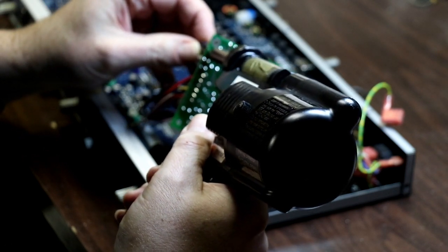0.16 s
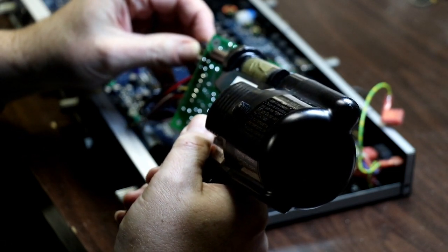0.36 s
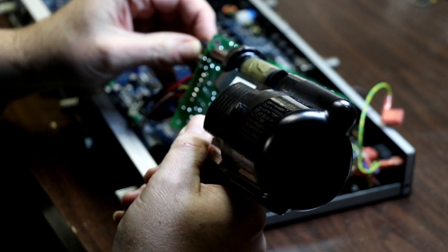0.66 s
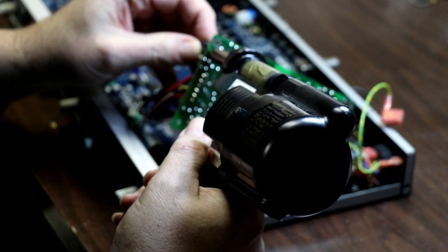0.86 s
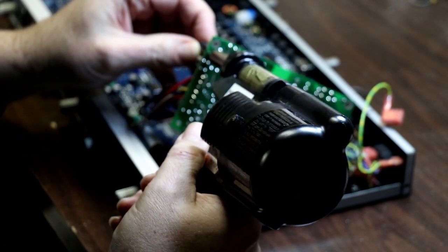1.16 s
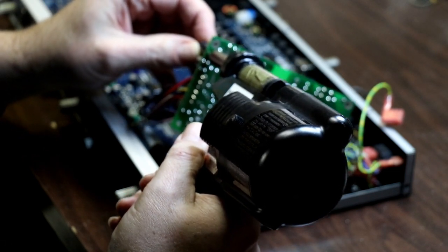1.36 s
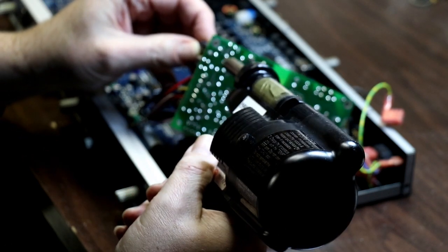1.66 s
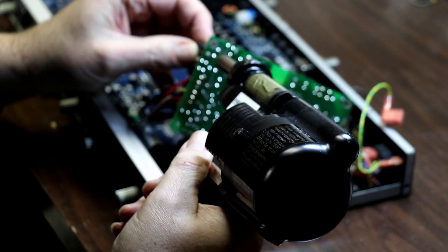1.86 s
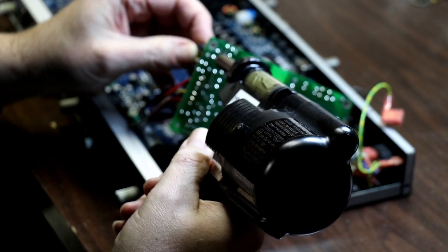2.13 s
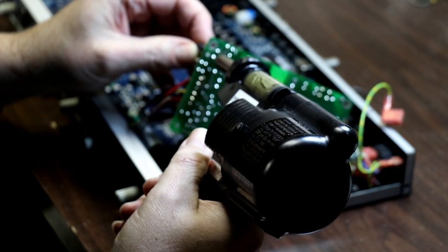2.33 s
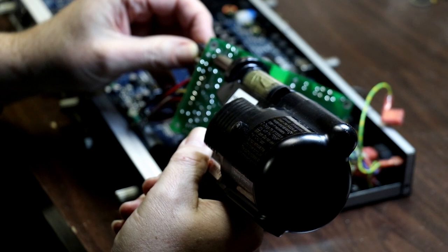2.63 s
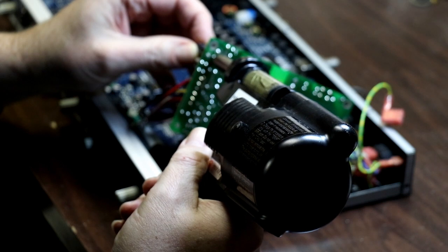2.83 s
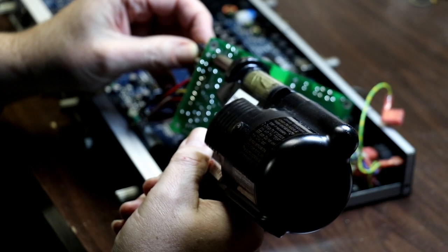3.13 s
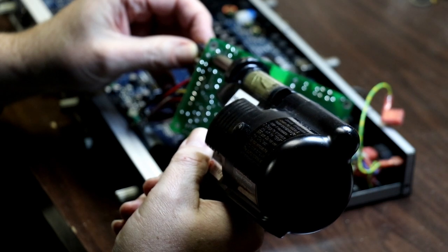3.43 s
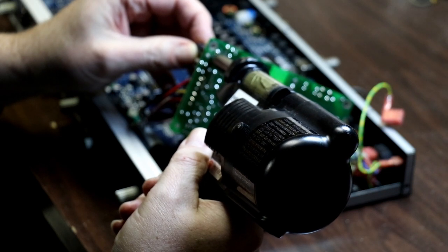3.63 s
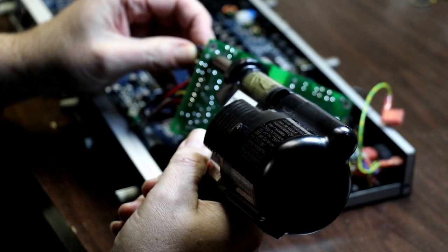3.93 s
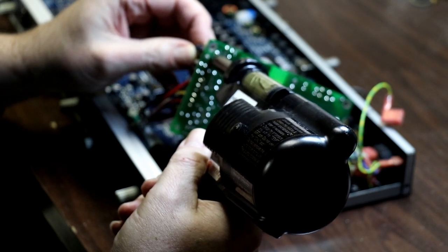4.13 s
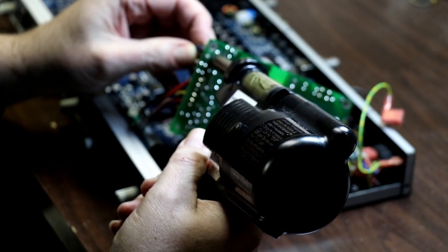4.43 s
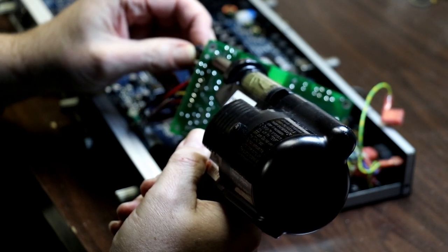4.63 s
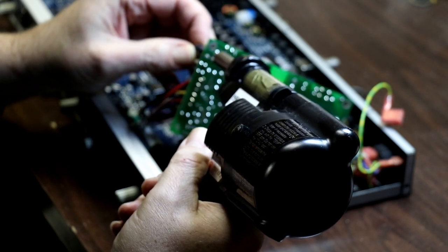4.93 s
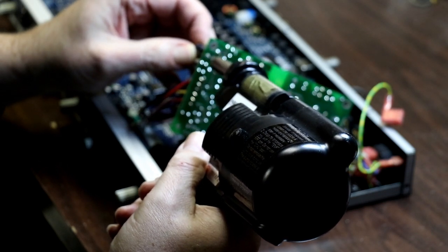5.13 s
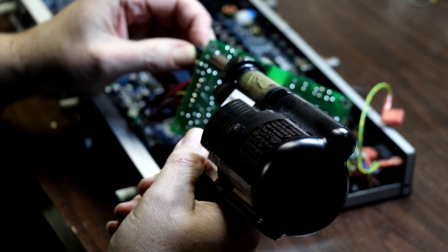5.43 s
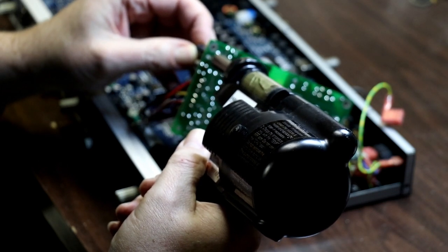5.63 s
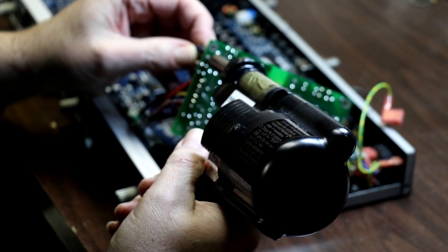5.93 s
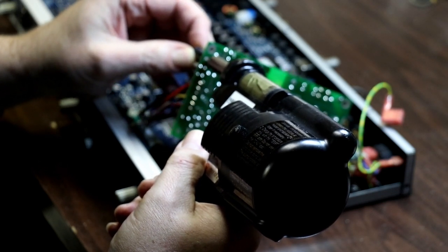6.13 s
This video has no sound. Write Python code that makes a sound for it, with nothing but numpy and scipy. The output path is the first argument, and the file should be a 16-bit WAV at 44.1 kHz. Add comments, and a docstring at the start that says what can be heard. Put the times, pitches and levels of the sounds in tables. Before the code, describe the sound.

Close vacuum-pump buzz and hissing air start and stop twice with sharp switch clicks, small taps in between, a fan humming steadily behind.

```python
"""In a small workshop a fan hums and whooshes throughout, further off than the gun at the stereo microphone.
A hand-held desoldering gun is triggered twice, close by over a workbench and a little to the right: the switch
snaps, a motor spins up a diaphragm pump, the first stroke knocks, the plastic body buzzes as a comb of stroke
multiples and rattles by its resonances, and noise hisses through the nozzle. At each release the switch snaps
again and the motor coasts down. Between the bursts and at the second press, short noise bursts tap."""
import sys
import numpy as np
from scipy import signal
from scipy.fft import rfft, irfft
from scipy.io import wavfile

SR = 44100
rng = np.random.default_rng(int(sys.argv[2]) if len(sys.argv) > 2 else 0)


def persist_wave(psi):
    """Save psi, clipped to +-1, as 16-bit WAV."""
    counts = np.round(np.clip(psi, -1, 1) * 32767).astype(np.int16)
    wavfile.write(sys.argv[1], SR, np.atleast_2d(counts).T)


N = 277080
TIME = np.arange(N) / SR


def from_db(db):
    """Decibels to gain."""
    return 10 ** (np.asarray(db) / 20)


def rms_one(x):
    """Scale to unit rms."""
    return x / np.sqrt(np.mean(x ** 2) + 1e-20)


def in_time(rows):
    """Columns of a curve table whose first column is seconds, one value per sample."""
    seconds, *columns = np.transpose(rows)
    return [np.interp(TIME, seconds, column) for column in columns]


def drift(rate_hz):
    """Slow random wander with spread 1: low-passed noise made at every 40th sample."""
    pole = np.exp(-80 * np.pi * rate_hz / SR)
    noise = rng.standard_normal(N // 40 + 2002)
    slow = signal.lfilter([1], [1, -2 * pole, pole * pole], noise)[2000:]   # drop the filter's start
    return np.interp(np.arange(N) / 40, np.arange(len(slow)), rms_one(slow))


def sides(pan_db):
    """Left and right gains of a left-minus-right level difference."""
    return from_db(np.array([[.5], [-.5]]) * pan_db)


def resonate(x, hz, width_hz):
    """Two-pole resonance; a unit click rings with a height of about 1."""
    radius, angle = np.exp(-np.pi * width_hz / SR), 2 * np.pi * hz / SR
    poles = [1, -2 * radius * np.cos(angle), radius * radius]
    return signal.lfilter([0, np.sin(angle)], poles, x + 1e-18)


def stereo_noise(spectrum, alike):
    """Coloured noise whose two sides agree as the likeness table says; rms 1."""
    log_hz = np.log(np.arange(1, N // 2 + 2) * SR / N)
    level_db, like = (np.interp(log_hz, np.log(np.array(p)[:, 0]), np.array(p)[:, 1])
                      for p in (spectrum, alike))
    like = np.clip(like, 0, 1)
    mid, side = rfft(rng.standard_normal((2, N)))
    both = np.sqrt(1 + like) * mid + np.sqrt(1 - like) * side * [[1], [-1]]
    return rms_one(irfft(from_db(level_db) * both, N))


ROOM_T60_S, ROOM_DB = 0.28, -4.5


def room(x):
    """Diffuse tail of the small workshop: decaying noise from 4 ms on, another one for each side."""
    t = np.arange(SR // 2) / SR
    tail = rng.standard_normal((2, len(t))) * from_db(-60 * t / ROOM_T60_S) * (t > .004)
    tail = tail / np.sqrt(np.sum(tail ** 2, axis=1, keepdims=True))
    return signal.fftconvolve(x, tail, axes=1)[:, :N]


# Fan air and room hiss. Each row: frequency in Hz, relative level in dB per Hz.
WHOOSH_SPECTRUM = [(20, -32), (50, -23), (90, -29), (107, -26), (118, -15.5), (185, -12), (215, -21.5),
                   (265, -21.5), (320, -23.5), (370, -18.5), (450, -25.5), (900, -31.5), (1280, -30),
                   (2000, -38), (4800, -48.5), (7200, -44), (11000, -47), (15800, -55)]
# How alike the whoosh is at the two capsules. Each row: frequency in Hz, left-right likeness (1 = same).
WHOOSH_LIKENESS = [(25, 0.75), (60, 0.82), (150, 1), (380, 0.84), (950, 0.41), (2400, 0.071), (6000, 0)]
# Weaker fan tones. Each row: frequency in Hz, mean rms level in dB.
FAN_TONES = [(48.4, -63), (72, -73), (96.5, -73), (121, -56.5), (145, -58.5), (242, -64.5), (264, -58.5),
             (355, -60.5), (385, -63), (625, -66.5), (700, -71)]
# Wavering blade hum. Each row: time in seconds, mean rms level in dB.
BLADE_LEVEL = [(0, -45), (.15, -42.5), (1.56, -46), (2.24, -42), (2.3, -59), (2.38, -43), (2.92, -46),
               (3.02, -53.5), (3.3, -47), (3.66, -40.5), (5.04, -52), (5.2, -39), (5.55, -45), (5.86, -42),
               (5.93, -57), (6.04, -45.5), (6.11, -55), (6.2, -38), (6.28, -45)]
BLADE_HZ, WHOOSH_DB = 192.8, -46.5


def fan():
    """Further off: air turbulence as noise, a wavering blade hum and weaker tones as drifting sines."""
    whoosh = from_db(WHOOSH_DB + 1.0 * drift(6.2)) * stereo_noise(WHOOSH_SPECTRUM, WHOOSH_LIKENESS)
    hum_gain = from_db(in_time(BLADE_LEVEL)[0] + 1.9 * drift(7))
    hum = hum_gain * np.sin(2 * np.pi * BLADE_HZ * TIME + 0.67 * drift(2.8))
    for hz, db in FAN_TONES:
        tone = np.sin(2 * np.pi * hz * TIME + 0.89 * drift(1.94))
        hum = hum + from_db(db + 2.0 * drift(3.9)) * tone
    return whoosh + np.sqrt(2) * hum   # rms to peak of a sine


# Taps on board and body. Each row: start in seconds, dry peak in dB, pitch in Hz.
TAP_ROWS = [(1.617, -42, 5400), (1.858, -48, 1000), (2.499, -48, 1250), (2.562, -36, 1150),
            (3.297, -40.5, 1900), (3.491, -46, 1350), (3.688, -27, 810)]


def taps():
    """Small taps: a noise burst of contacts fading over 1.8 ms, through two broad resonances."""
    out = np.zeros(N)
    bursts = rng.standard_normal((len(TAP_ROWS), 800)) * np.exp(-np.arange(800) / 78.0)
    for (start_s, db, hz), burst in zip(TAP_ROWS, bursts):
        ring = resonate(resonate(burst, hz, 0.67 * hz), hz, .8 * hz)
        out[round(start_s * SR):][:800] += from_db(db) * ring / np.max(abs(ring))
    return out


# Ringing of the trigger switch. Each row: frequency in Hz, width in Hz, relative level in dB.
SWITCH_RINGS = [(3440, 650, 2.5), (6300, 600, 4), (8500, 900, -2), (12100, 900, 0)]


def switch():
    """A snap with fast bounces at press and release; too small a part to radiate lows."""
    clicks = np.zeros(N)
    snaps = []
    for row in TRIGGER_PULLS:
        snaps += [(row[0], row[6]), (row[1], row[7])]
    bounces = rng.standard_normal((len(snaps), 200)) * np.exp(-np.arange(200) / 60.)
    for (start_s, db), bounce in zip(snaps, bounces):
        clicks[round(start_s * SR):][:200] = from_db(db) * bounce
    snap = sum(from_db(db) * resonate(clicks, hz, width_hz) for hz, width_hz, db in SWITCH_RINGS)
    high_pass = signal.butter(4, 2500, "high", fs=SR, output="sos")
    return signal.sosfilt(high_pass, snap) * sides(-1)


# Suction hiss. Each row: frequency in Hz, relative level in dB per Hz.
AIR_SPECTRUM = [(300, -45), (2090, 6), (3550, -5.5), (5400, 0), (6080, -2), (6880, -2), (7650, 2),
                (8670, -4), (9530, -1), (10100, -1.5), (13000, -13.5), (14600, -15), (15800, -21)]
# How alike the hiss is at the two capsules. Each row: frequency in Hz, left-right likeness (1 = same).
AIR_LIKENESS = [(1500, 0.97), (3500, 0.46), (6800, 0.79), (15000, .3)]
# Nozzle and filter. Each row: frequency in Hz, width in Hz, mean level in dB against the hiss.
NOZZLE_WHISTLES = [(3600, 51, -28), (4290, 80, -27), (5020, 89, -25), (5460, 110, -16), (6800, 120, -28),
                   (7460, 43, -20), (8060, 140, -16.5), (9300, 53, -16), (9770, 130, -20.5),
                   (11300, 180, -21.5)]
VALVE_HZ, VALVE_WIDTH_HZ = 5200, 590


def air(turns, pulse_db, flutter_db, tick_db):
    """Suction hiss swells once a stroke; narrow resonances come and go in the nozzle; the valve ticks."""
    hiss = stereo_noise(AIR_SPECTRUM, AIR_LIKENESS)
    white = rng.standard_normal(N)
    for hz, width_hz, db in NOZZLE_WHISTLES:
        hiss = hiss + from_db(db + 2.6 * drift(4.6)) * rms_one(resonate(white, hz, width_hz))
    stroke = np.diff(np.floor(turns), prepend=0) > 0
    slap = stroke * from_db(tick_db + 3.0 * rng.standard_normal(N))
    tick = resonate(np.diff(slap, prepend=0), VALVE_HZ, VALVE_WIDTH_HZ)   # the valve flap slaps shut
    pulse = from_db(pulse_db * np.cos(2 * np.pi * (turns - .4)) + flutter_db * drift(58))
    return (tick + hiss * pulse) * sides(-4)


# Resonances of the gun body. Each row: frequency in Hz, width in Hz, relative level in dB,
# left minus right in dB.
BODY_MODES = [(200, 90, -16, 0), (403, 65, -6.5, 0.5), (511, 24, -9, -3), (689, 45, -2.5, -1),
              (879, 46, -3.5, 4.5), (1000, 120, -8, -16), (1296, 51, 1, -1), (1612, 120, 0, 2),
              (1935, 126, 1, -12.5), (2100, 97, 1, -0.5), (2394, 135, -1.5, -7.5), (2690, 130, -2.5, 1),
              (2930, 230, 2.5, -6.5)]
BODY_TOP_HZ = 3300
DULLING = 0.7   # power of the speed per octave above the lowest mode: higher modes weaken more at low speed


def first_strokes():
    """The diaphragm breaks loose: one knock into every body mode."""
    clicks = np.zeros(N)
    for on, *_, after_s, db in TRIGGER_PULLS:
        clicks[round((on + after_s) * SR)] = from_db(db)
    knock = 0
    for k, (hz, width_hz, db, pan_db) in enumerate(BODY_MODES):
        gain = (-1) ** k * from_db(db + 0.83 * np.log2(hz / 1000)) * sides(pan_db)
        knock = knock + gain * resonate(clicks, hz, width_hz)
    return knock


def rattle(share, turns, beat_db, uneven_db, loose_db, grit_db, contacts):
    """What differs from stroke to stroke rings the body; loose parts chatter below full speed."""
    stroke = np.diff(np.floor(turns), prepend=0) > 0
    contact = np.diff(np.floor(turns * contacts), prepend=0) > 0
    beat = np.cos(2 * np.pi * (RIPPLE_HZ * TIME - turns))
    chance = rng.standard_normal((4, N))
    knocks = stroke * (from_db(beat_db) * beat + from_db(uneven_db) * chance[0])
    # the same contacts every turn
    pattern = rng.standard_normal(contacts)[(turns * contacts).astype(int) % contacts]
    chatter = from_db(loose_db) * (1 - share ** 5.0) * (1.04 * pattern + 1.24 * chance[1])
    grit = from_db(grit_db) * (chance[2] + .5 * chance[3] * [[1], [-1]])   # bearings and valve flutter
    force = knocks + contact * chatter + grit
    body = 0
    for k, (hz, width_hz, db, pan_db) in enumerate(BODY_MODES):
        dulled = force * share ** (DULLING * np.log2(hz / BODY_MODES[0][0]))
        body = body + (-1) ** k * from_db(db) * sides(pan_db) * resonate(dulled, hz, width_hz)
    # the shell is dead above
    return signal.sosfilt(signal.butter(6, BODY_TOP_HZ, fs=SR, output="sos"), body)


# Steady buzz, one row per multiple 1, 2, 3 .. of the stroke rate.
# Each row: relative level in dB, left minus right in dB.
BUZZ_ORDERS = [(-39.5, 0), (-36.5, -1), (-37, 0), (-29.5, -2), (-29.5, 0.5), (-30.5, -1.5), (-23, 4),
               (-31.5, -1), (-37, -1.5), (-35.5, -7), (-36.5, -1), (-39.5, 6), (-34.5, -4.5), (-28, 0.5),
               (-46, -11), (-32.5, -8), (-43, -10), (-33.5, 7), (-42.5, -17), (-35, -14), (-32, -2),
               (-35.5, 1), (-46, -12), (-34.5, -5.5), (-33.5, 0), (-52.5, -12), (-45, -7), (-41.5, -5),
               (-40.5, 0), (-40, 0), (-45, -2), (-50, -5), (-53, -5), (-59, 4), (-53.5, 13), (-66, 11),
               (-61, -2), (-58, -4), (-55, 0), (-59, -4), (-67, -9), (-71, -7), (-51, 5), (-52.5, -1)]
# One multiple fades and swells by itself. Each row: time in seconds, gain in dB.
ORDER_SWELL = [(.5, 6.5), (.7, 3.5), (1.4, 3), (3.9, -4.5), (4.9, 10.5)]
SWELL_ORDER, RIPPLE_HZ = 13, 120


def buzz(share, turns, wander, ripple_db, settle):
    """Alike strokes give a comb of multiples; it locks in only near full speed."""
    orders = np.arange(1, len(BUZZ_ORDERS) + 1)
    live = share > .3   # the comb is only made above this share of full speed
    # several contacts a stroke scatter the phases; higher multiples differ more between the sides
    phase = rng.standard_normal(len(orders)) * (.9 + 2 * np.exp(-orders / 8))
    lag = .07 + .6 * np.tanh(orders / 14) ** 2 * rng.standard_normal(len(orders))
    turn = np.exp(2j * np.pi * turns[live])
    total, multiple = 0, 1
    for k, (order, (db, pan_db)) in enumerate(zip(orders, BUZZ_ORDERS)):
        multiple = multiple * turn
        sway = 1 + wander * np.sqrt(order) * (drift(5.3) + 1j * drift(4.3))[live]
        if order == SWELL_ORDER:
            sway = sway * from_db(in_time(ORDER_SWELL)[0][live])
        line = np.sqrt(2) * from_db(db) * sway * multiple
        line = line * share[live] ** (settle * np.sqrt(order / 7))   # high multiples smear longest
        side_phase = phase[k] + lag[k] * np.array([[-.5], [.5]])
        total = total + line * sides(pan_db) * np.exp(1j * side_phase)
    # rectified mains beats against the stroke rate and adds a weak line beside each multiple
    beat = np.exp(2j * np.pi * RIPPLE_HZ * TIME[live]) / turn
    out = np.zeros((2, N))
    out[:, live] = (total * (1 + from_db(ripple_db) * beat)).real
    return out


# Trigger pulls. Each row: press in seconds, release in seconds, early and late full-speed strokes per second,
# relative buzz level in dB, relative air level in dB, press and release click drive in dB,
# first hard stroke in seconds after the press, its knock drive in dB.
TRIGGER_PULLS = [(.274, 1.463, 98.2, 98.45, -0.5, -33, -40, -35, .0261, -26),
                 (3.682, 4.900, 98.25, 98.75, -0.5, -33, -39.5, -40, .029, -24.5)]
SPIN_UP_S, COAST_S = .035, .09   # time constants


def motor():
    """Share of full speed (a first-order rise, then a coast) and the turns made so far."""
    share, speed = np.zeros(N), []
    for on, off, early, late, *_ in TRIGGER_PULLS:
        rise = 1 - np.exp(-np.clip(TIME - on, 0, off - on) / SPIN_UP_S)
        coast = np.exp(-np.clip(TIME - off, 0, None) / COAST_S)
        share = np.maximum(share, rise * coast)
        speed += [(on, early), (off, late)]
    return share, np.cumsum(share * in_time(speed)[0]) / SR


STALL_S = 0.0053   # the motor strains silently before its buzz is heard
BUZZ_POWER, AIR_POWER = 1.9, 0.73   # loudness grows as a power of the rising speed
SURGE_S, BUZZ_SURGE_DB, AIR_SURGE_DB = 0.07, 2, 2   # overshoot while the pump loads up
BUZZ_FALL_DB_PER_S, AIR_FALL_DB_PER_S = 195, 233


def effort(levels_db, stall_s, power, surge_db, fall_db_per_s):
    """Gain over time: rise with the speed, a surge, a hold, a steady fall in dB."""
    gain = np.zeros(N)
    for (on, off, *_), db in zip(TRIGGER_PULLS, levels_db):
        since = np.clip(TIME - on, 0, None)
        rise = 1 - np.exp(-np.clip(since - stall_s, 0, None) / SPIN_UP_S)
        surge = (since / SURGE_S) ** 2 * np.exp(2 - 2 * since / SURGE_S)
        fall_db = fall_db_per_s * np.clip(TIME - off, 0, None)
        gain += rise ** power * from_db(db + surge_db * surge - fall_db)
    return gain


def scene():
    """Gun close by, a little to the right; fan further off. The room is heard on the unsteady sounds."""
    share, turns = motor()
    buzz_db, air_db = np.transpose(TRIGGER_PULLS)[4:6]
    body_gain = effort(buzz_db, STALL_S, BUZZ_POWER, BUZZ_SURGE_DB, BUZZ_FALL_DB_PER_S)
    air_gain = effort(air_db, 0, AIR_POWER, AIR_SURGE_DB, AIR_FALL_DB_PER_S)
    steady = body_gain * buzz(share, turns, wander=0.054, ripple_db=-30, settle=2.8)
    loose = rattle(share, turns, beat_db=-34, uneven_db=-42.5, loose_db=-22, grit_db=-57.5, contacts=7)
    hiss = air(turns, pulse_db=2.24, flutter_db=0.95, tick_db=7)
    unsteady = body_gain * loose + air_gain * hiss
    unsteady = unsteady + first_strokes() + switch() + taps()
    return steady + unsteady + from_db(ROOM_DB) * room(unsteady) + fan()


CUTOFF_HZ = 15800


def record(dry):
    """Stereo microphone: the left capsule hears everything one sample later; the top is cut steeply."""
    dry = np.array([np.roll(dry[0], 1), dry[1]])
    return signal.sosfilt(signal.ellip(14, .3, 70, CUTOFF_HZ, fs=SR, output="sos"), dry)


dry = scene()
out = record(dry)
persist_wave(out)
```